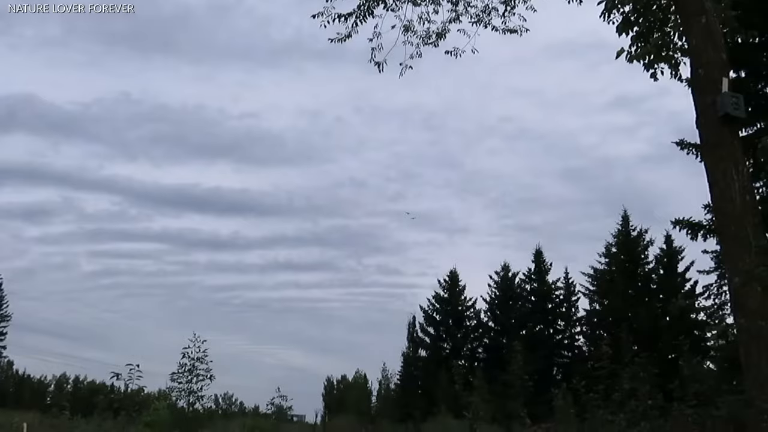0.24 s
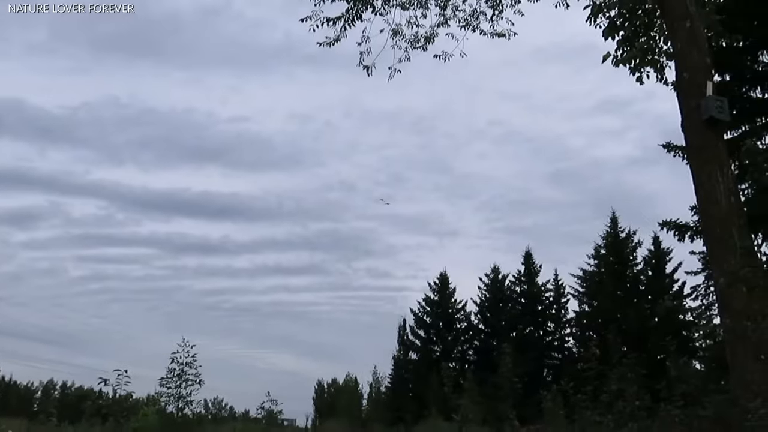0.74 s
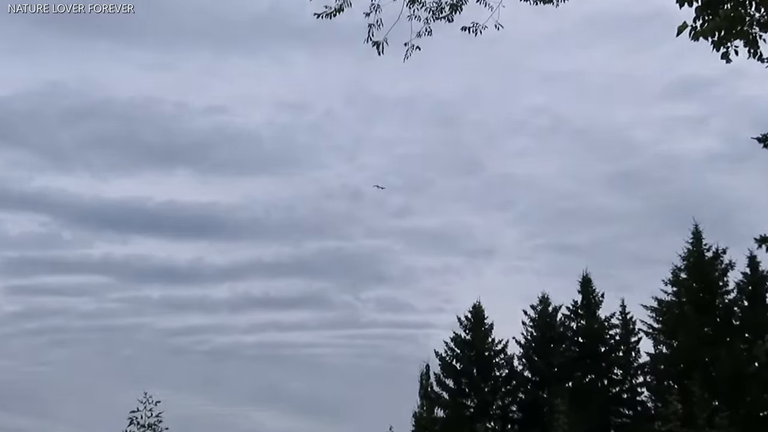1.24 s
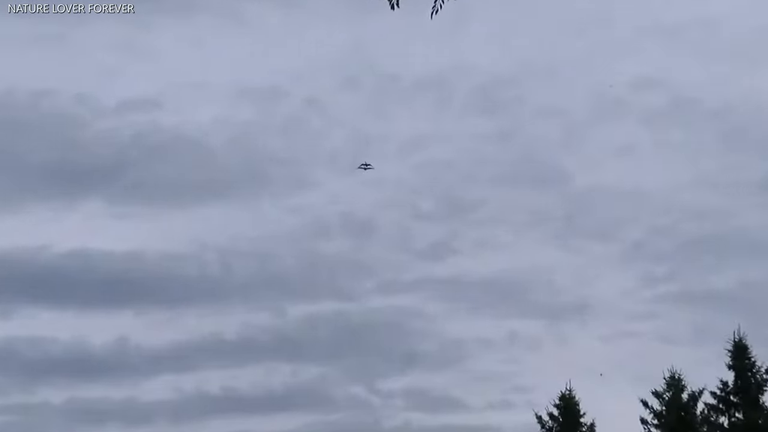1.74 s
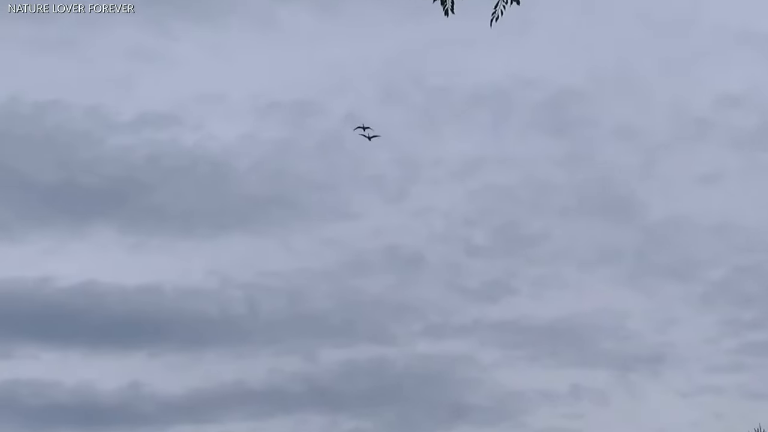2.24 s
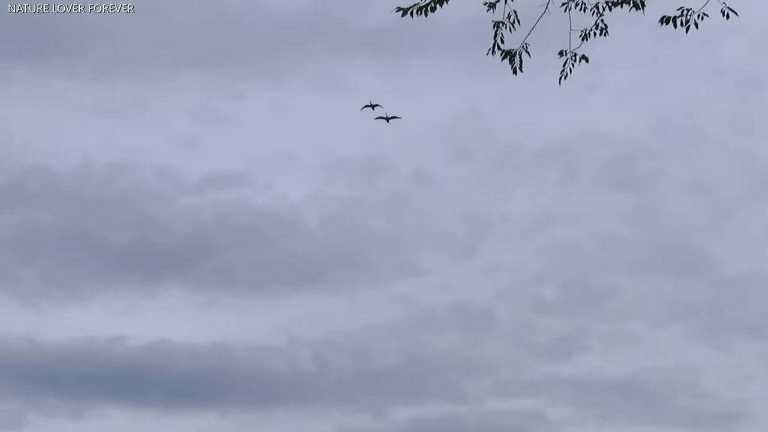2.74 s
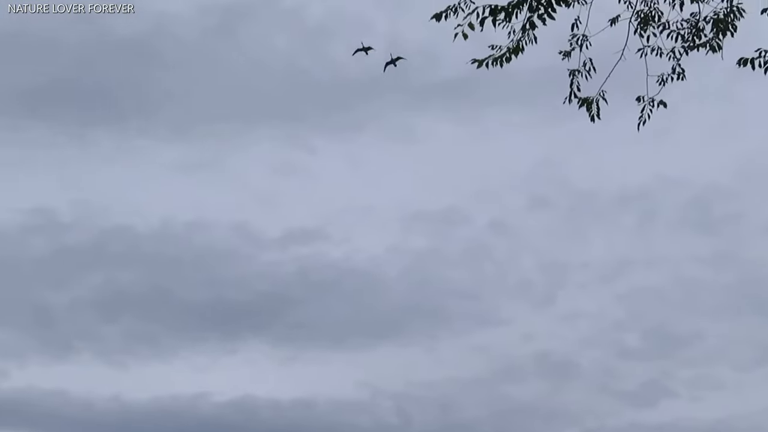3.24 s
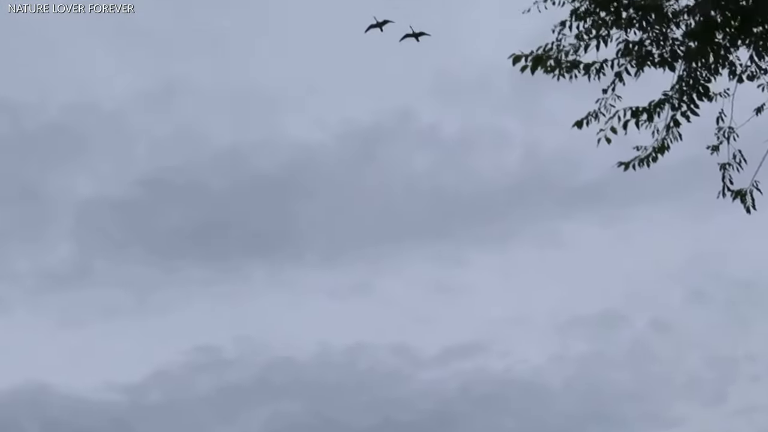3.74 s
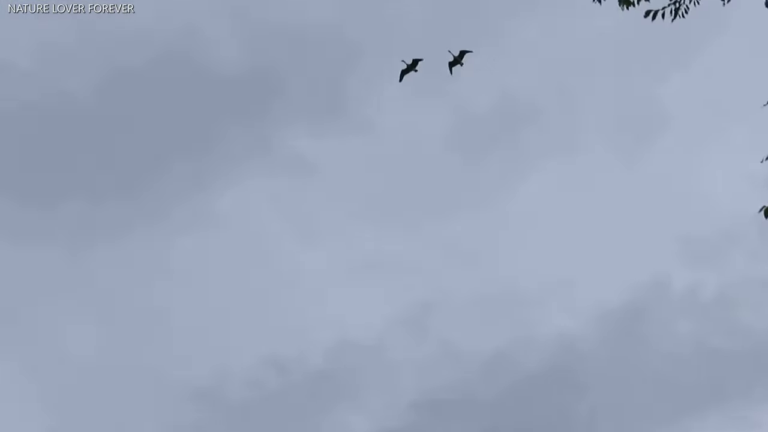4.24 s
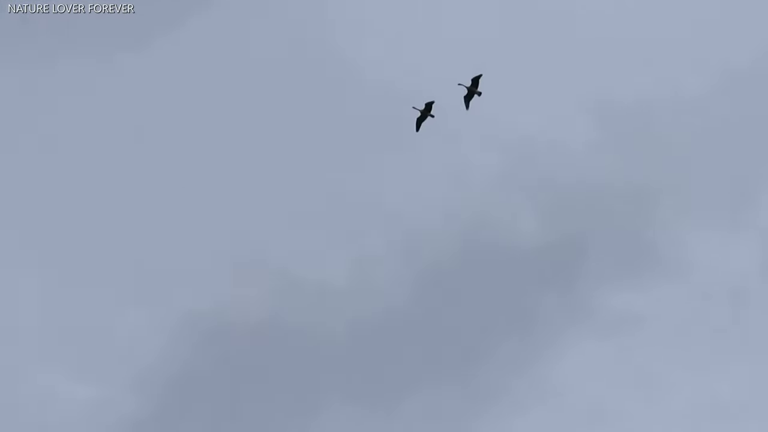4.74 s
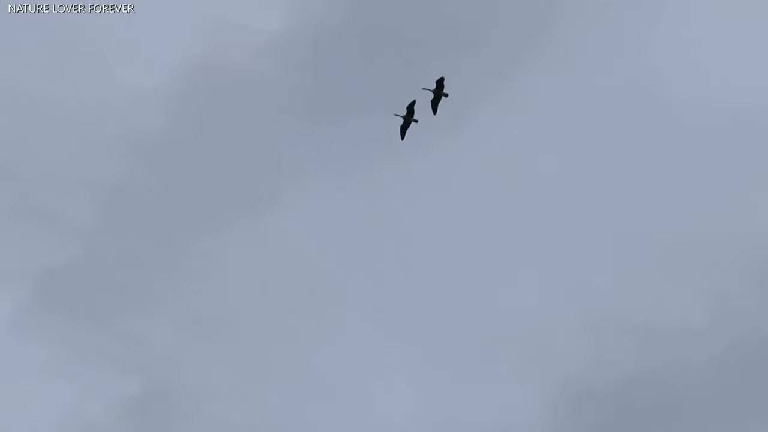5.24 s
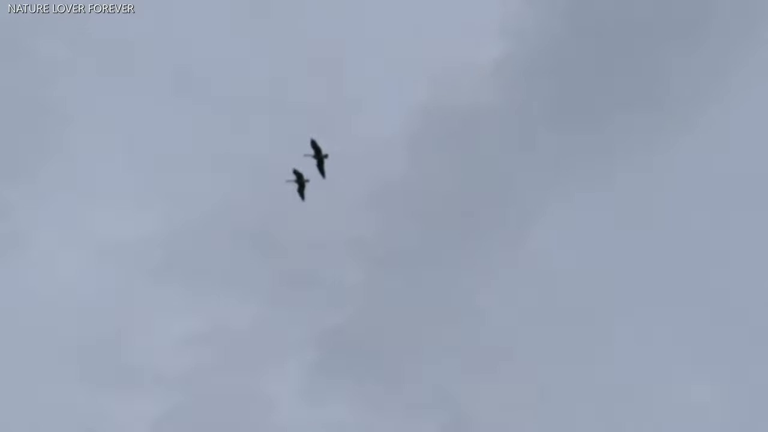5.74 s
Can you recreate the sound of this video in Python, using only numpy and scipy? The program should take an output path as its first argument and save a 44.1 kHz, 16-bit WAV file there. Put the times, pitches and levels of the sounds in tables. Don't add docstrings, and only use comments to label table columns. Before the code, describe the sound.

Outdoors by a wood edge, a pair of geese trade short, brassy, two-part honks, steadily to the end, while another goose answers weakly further off. A silent instant comes first, then low, even traffic rumble and soft air hiss, briefly wider in the treble early on. The calls are close and clear, with a dull reverberant tail from the trees, in stereo from a camera microphone, ending slightly left.

```python
import sys
import numpy as np
from scipy import signal
from scipy.fft import rfft, irfft, next_fast_len
from scipy.io import wavfile
from scipy.ndimage import uniform_filter1d, map_coordinates

SR = 44100
rng = np.random.default_rng(int(sys.argv[2]) if len(sys.argv) > 2 else 0)


def dump_mix(stems):
    frames = np.atleast_2d(stems).T
    limited = np.clip(frames, -1, 1)
    pcm = np.round(limited * 32767).astype(np.int16)
    wavfile.write(sys.argv[1], SR, pcm)


def invert_db(level):
    return 10 ** (np.asarray(level, dtype=float) / 20)


N = 263277

# [f/Hz, density/dB]
AIR_SPECTRUM = [(25, -9.5), (50, 1), (80, 0.5), (130, -4), (250, -11.5), (500, -13), (1100, -13.5),
                (1800, -29.5), (3000, -33.5), (5000, -38.5), (8000, -44), (12000, -51), (15500, -52.5)]
# [t/s, level/dB]
TRAFFIC_RUMBLE = [
    (.16, -38),
    (.4, -46),
    (2, -45),
    (4, -45),
    (5.2, -44.5),
    (5.97, -42),
]
# [f/Hz, side minus mid level/dB]
AIR_WIDTH = [(40, -29.5), (110, -27.5), (200, -14), (380, -9), (700, -22.5), (1300, -13), (2400, -1.5),
             (4400, -3.5), (8000, -9), (12000, -14.5)]
# [t/s, share 0-1]
ZOOM_SHARE = [
    (.15, 0),
    (.72, 0),
    (.84, 1),
    (1.93, 1),
    (1.97, 0),
    (5.97, 0),
]
# [t/s, left minus right level/dB]
FLIGHT_PAN = [
    (0.15, 1),
    (0.63, -1),
    (1.59, -.6),
    (3.7, -.8),
    (5.09, 3.5),
    (5.97, 3.3),
]

# [start t/s, length t/s, middle f/Hz, level/dB]
THIRD_LOW_NOTES = [(.17, 0.0364, 552.8, -40), (.322, .086, 640, -55), (.54, 0.12, 598, -40.5),
                   (.71, .095, 570, -56), (2.122, .086, 655, -43), (2.342, .096, 570, -38.5),
                   (2.475, .045, 650.3, -47.5), (2.83, 0.086, 658, -43.5), (3.652, 0.088, 532.4, -46),
                   (3.94, .08, 593, -58), (5.142, 0.11, 612, -44.5), (5.462, 0.075, 527.5, -59)]
FIRST_LOW_NOTES = [(.597, 0.066, 514.7, -34.5), (.857, 0.072, 493, -30), (1.127, 0.05, 478, -35.5),
                   (1.467, 0.088, 495.3, -27.5), (1.861, .092, 500.5, -28), (2.187, 0.095, 495.3, -27),
                   (2.487, 0.067, 478.2, -28.5), (2.824, .04, 531.4, -32.5), (3.127, 0.067, 484.7, -36),
                   (3.507, 0.1, 490.5, -25), (4.107, .076, 487, -26.5), (4.507, 0.099, 501.7, -26.5),
                   (4.917, 0.07, 487.7, -27), (5.237, 0.084, 469.3, -28), (5.607, 0.054, 460, -32.5)]
SECOND_LOW_NOTES = [(.927, 0.047, 571, -24.5), (1.267, 0.051, 581.3, -25), (1.617, 0.02, 535, -40.5),
                    (1.957, 0.033, 537.7, -29.5), (2.287, 0.038, 565, -26), (2.601, .055, 559, -24.5),
                    (2.949, 0.056, 565, -24.5), (3.287, 0.048, 563, -25), (3.597, 0.041, 560, -28),
                    (3.893, 0.059, 574, -24.5), (4.187, .051, 558.5, -30), (4.315, 0.045, 536, -37.5),
                    (4.681, 0.0508, 584, -26.5), (5.058, 0.0459, 557, -30.5), (5.403, 0.053, 539, -31),
                    (5.783, 0.072, 569.2, -23)]
# [start t/s, length t/s, middle f/Hz, level/dB, treble level/dB as the bill turns]
THIRD_HIGH_NOTES = [(.194, .096, 764.4, -44, 0.5), (.323, 0.085, 880, -40.5, 4.5),
                    (.71, .095, 780, -49, 6.5), (1.044, 0.044, 902, -52, -6), (1.85, .062, 883, -40, -4),
                    (2.122, 0.081, 879, -34, 3.5), (2.353, 0.091, 973.5, -48.5, 6),
                    (2.482, .068, 905, -33, 0), (2.82, 0.11, 872, -39.5, 6.5), (3.65, .096, 859, -37, 8),
                    (3.942, .078, 851.5, -37, 9.5), (4.192, .061, 840, -51, -8.5),
                    (5.14, 0.09, 822.4, -36.5, 7), (5.46, 0.091, 840, -37, 12)]
FIRST_HIGH_NOTES = [(.364, .049, 722, -45.5, -3), (.621, .066, 732.4, -34, -3.5),
                    (.908, .03, 706, -49, -14), (1.161, .055, 680, -32.5, -24.5),
                    (1.527, .047, 672, -42, -28), (1.929, .049, 681.3, -33, -10.5),
                    (2.26, .043, 702, -32.5, -2.5), (2.525, .066, 680.5, -32.5, -4),
                    (2.826, .067, 684, -31, 0.5), (3.169, .063, 678.4, -29, -3.5),
                    (3.588, .036, 708, -31.5, -1), (4.158, .064, 702.5, -31, -2),
                    (4.584, .047, 681.8, -33.5, 2.5), (4.967, .055, 672, -31, 1),
                    (5.305, .058, 674.4, -32, -0.5), (5.647, .064, 677, -31.5, 5.5)]
SECOND_HIGH_NOTES = [(0.955, 0.039, 751, -29, -16.5), (1.297, 0.046, 771, -30, -9),
                     (1.603, 0.096, 789.6, -27, -11.5), (1.977, 0.061, 767, -25.5, 3),
                     (2.297, 0.075, 783.4, -26.5, -2), (2.636, 0.056, 766, -25, -5),
                     (2.988, .056, 761, -25, -5.5), (3.317, 0.06, 771.2, -25, -5.5),
                     (3.617, 0.065, 790, -23.5, 0), (3.932, 0.049, 773, -24, -2),
                     (4.215, .066, 760, -35, -1), (4.347, .07, 765.7, -22.5, -0.5),
                     (4.708, 0.063, 776.4, -25, 1.4), (5.077, .074, 785, -23.5, 1),
                     (5.425, 0.077, 778, -23.5, -4), (5.838, .048, 747, -28, 0.5)]
# [start t/s, length t/s, middle f/Hz, level/dB]
STALLED_NOTES = [(.922, .031, 770.3, -34.5), (1.263, .036, 789.6, -36.5), (2.597, .032, 798, -36.5),
                 (2.954, .031, 786, -31.5), (3.285, .026, 791, -31.5), (3.895, .035, 805, -36),
                 (5.78, .05, 792.6, -33)]
# [start t/s, length t/s, middle f/Hz, level/dB]
FLOCK_CRIES = [
    (.166, 0.039, 817, -60.5),
    (.596, 0.01, 700, -55),
    (2.786, 0.037, 715, -57),
    (2.808, 0.022, 828, -54),
    (3.5, 0.027, 764.5, -54),
]
# [t/s, half length t/s, extra rasp level/dB]
SQUAWK_RASP = [
    (0.658, 0.019, 16),
    (2.398, 0.044, 10),
    (2.843, 0.02, 12),
    (4.357, 0.009, 8.5),
    (5.432, 0.027, 6.5),
    (4.705, 0.019, 5.5),
    (5.079, 0.013, 5.5),
]

# [f/Hz, level/dB]
THROAT_RESPONSE = [(150, -32.5), (450, -5.5), (800, -6.5), (1050, 1), (1600, -2), (1900, -11.5),
                   (2400, -15), (3100, -20), (3900, -15.5), (4700, -16.5), (5500, -22), (6500, -26),
                   (8000, -37), (11000, -55.5)]
# [multiple of the fundamental, level/dB]
LOW_OVERTONES = [(1, -3), (2, -1.5), (3, -15), (4, -10.5), (6, -12.5), (16, -35.5)]
HIGH_OVERTONES = [(1, 0.5), (2, 2), (3, -1.5), (4, -9), (6, -6), (13, -14)]

# (start below middle/share, end below middle/share, length for full scoop t/s, for full bend t/s
FIRST_LOW_ARC, FIRST_HIGH_ARC = (0.13, -.05, .08, .08), (-.03, .11, .05, .056)
SECOND_LOW_ARC, SECOND_HIGH_ARC = (.13, -.12, .056, .056), (.09, .14, .09, .06)
THIRD_LOW_ARC, THIRD_HIGH_ARC = (0.0082, .01, .08, .08), (-.006, .06, .08, .08)
STALL_ARC, RESTART_ARC = (0.11, -0.018, .026, -0.012), (-.035, .125, 0.0536, .055)
LOW_SWELL, HIGH_SWELL = (.8, 1.43, 0.5), (1.75, 0.68, 0.5)


def curve(rows):
    return np.interp(np.arange(N) / SR, *np.transpose(rows))


def colour(rows, hz):
    f, db = np.transpose(rows)
    return np.interp(np.log(np.maximum(hz, 1)), np.log(f), db)


def shaped(x, gain):
    size = next_fast_len(N)
    hz = np.arange(size // 2 + 1) * SR / size
    return irfft(rfft(x, size) * gain(hz), size)[..., :N]


def walk(rate):
    hold = int(SR / rate)
    steps = np.repeat(rng.standard_normal(N // hold + 1), hold)
    return 1.257 * uniform_filter1d(uniform_filter1d(steps, hold), hold)[:N]


def traffic():
    out, swell, zoom, rumble_db = 0, walk(0.21), curve(ZOOM_SHARE), curve(TRAFFIC_RUMBLE)
    for centre in 25 * 2 ** np.arange(0, 9.5, .5):
        def band(hz):
            octaves = np.clip(np.log2((hz + 1) / centre), -.5, .5)
            return invert_db(colour(AIR_SPECTRUM, hz)) * np.cos(np.pi * octaves)

        mid, side = shaped(rng.standard_normal((2, N)), band)
        treble = np.clip(np.log2(centre / 1500) / 2.5, 0, 1) * zoom
        bass_db = np.clip(np.log2(250 / centre), 0, 1) * (rumble_db - rumble_db.mean())
        mid = mid * invert_db(-3 * treble ** 4)
        side = side * invert_db(colour(AIR_WIDTH, centre) * (1 - treble) + 3.5 * treble)
        level = invert_db(bass_db + 0.46 * swell + 1.17 * walk(6.3))
        out = out + level * (mid + side * np.array([[1], [-1]]))
    return out * invert_db(-40.5) / np.sqrt(np.mean(out ** 2))


def trees(x, t60_s, delay_s, top_hz, early_db, late_db):
    t = np.arange(int(2.5 * SR)) / SR
    mid, side = rng.standard_normal((2, len(t)))
    noise = mid + 0.1 * side * np.array([[1], [-1]])
    tail = noise * invert_db(late_db - 60 * t / t60_s) * np.clip((t - delay_s) / 0.044, 0, 1)
    tail = signal.sosfilt(signal.butter(2, top_hz, fs=SR, output="sos"), tail)
    cluster = noise[:, ::-1] * invert_db(early_db - 60 * t / 0.23) * (t > .004)
    return signal.fftconvolve(x[None], tail + cluster, axes=1)[:, :N]


def place(x, pan_db):
    sides = np.array([[.5], [-.5]])
    lag = sides * (0.48 - 0.74 * pan_db)
    delayed = np.array([map_coordinates(x, [np.arange(N) - d], order=3) for d in lag])
    return delayed * invert_db(sides * pan_db)


def arcs(rows, arc):
    scoop, sag, scoop_s, sag_s = arc
    notes = []
    for t, length, hz, db, *_ in rows:
        start_hz = hz * (1 - scoop * min(length / scoop_s, 1) ** 2)
        end_hz = hz * (1 - sag * min(length / sag_s, 1) ** 2)
        notes.append((t, t + length, start_hz, hz, end_hz, db))
    return notes


def second_high():
    notes = []
    for row in SECOND_HIGH_NOTES:
        stalled = any(0 < row[0] - t < .07 for t, *_ in STALLED_NOTES)
        notes += arcs([row], RESTART_ARC if stalled else SECOND_HIGH_ARC)
    return notes + arcs(STALLED_NOTES, STALL_ARC)


def facing(rows):
    return [(t + length / 2, treble_db) for t, length, _, _, treble_db in rows]


def membrane(notes, bend, skew, round_power, waver, shimmer_db):
    hz, gain, effort = np.full(N, 600.), np.zeros(N), np.zeros(N)
    for t0, t1, start_hz, middle_hz, end_hz, db in notes:
        i = slice(int(t0 * SR), int(t1 * SR))
        u = np.linspace(0, 1, i.stop - i.start)
        w = u ** bend
        hz[i] = 2 * start_hz * (w - .5) * (w - 1) - 4 * middle_hz * w * (w - 1) + 2 * end_hz * w * (w - .5)
        lateness = skew * max((t1 - t0) / 0.069, 1) ** 0.61
        effort[i] = abs(np.sin(np.pi * u ** lateness))
        gain[i] = invert_db(db) * effort[i] ** round_power
    hz = hz * (1 + waver * walk(400))
    phase = 2 * np.pi * np.cumsum(hz) / SR
    return hz, phase, gain * invert_db(shimmer_db * walk(150)), effort


def partials(gain, tones, treble_db, size):
    out, on, flutter = np.zeros(N), gain > 0, walk(120)
    for hz, phase, db in tones(on):
        hz = hz * size
        high = np.clip(np.log2(np.maximum(hz, 1) / 1600) / 0.62, 0, 1)
        shift, turn = rng.random(2)
        own_db = 2.5 * np.roll(flutter, int(shift * N))[on]
        level_db = db + colour(THROAT_RESPONSE, hz) + high * treble_db[on] + (0.52 + 0.63 * high) * own_db
        out[on] += invert_db(level_db) * np.cos(phase + 2 * np.pi * turn)
    return np.sqrt(2) * gain * out


def goose(low, high, bill, size, first_db, cross_db, rasp_db):
    f1, p1, g1, e1 = membrane(low, *LOW_SWELL, .011, 1.5)
    f2, p2, g2, e2 = membrane(high, *HIGH_SWELL, .008, 1.4)
    both = np.sqrt(g1 * g2) * np.sqrt(e1 * e2) ** 0.65
    g1, g2 = g1 * (1 - .3 * e2), g2 * (1 - .55 * e1)
    bill_db = curve(bill)

    def low_tones(on):
        return [(k * f1[on], k * p1[on], colour(LOW_OVERTONES, k)) for k in range(1, 17)]

    def high_tones(on):
        return [(k * f2[on], k * p2[on], colour(HIGH_OVERTONES, k) + first_db * (k == 1))
                for k in range(1, 14)]

    def mixing_tones(on):
        tones = []
        for m in range(-2, 6):
            for n in range(1, 7):
                if m:
                    order = m * n * .5 + .5 if m > 0 else n - 3 * m
                    hz = abs(m * f1[on] + n * f2[on])
                    tones.append((hz, m * p1[on] + n * p2[on], cross_db - 10.5 * np.log2(order)))
        return tones

    voice = partials(g1, low_tones, bill_db - 11.7 * (1 - e1), size)
    voice += partials(g2, high_tones, bill_db - 11.7 * (1 - e2), size)
    voice += partials(both, mixing_tones, bill_db, size)
    puffs = 0.6 * both * (1 + np.cos(p2 - p1)) + 0.29 * g1 + 0.25 * g2
    breath = shaped(rng.standard_normal(N), lambda hz: invert_db(colour(THROAT_RESPONSE, hz) + rasp_db))
    t = np.arange(N) / SR
    hoarse_db = sum(db * np.exp(-((t - middle) / half) ** 2) for middle, half, db in SQUAWK_RASP)
    return voice + puffs * breath * invert_db(hoarse_db + bill_db)


def scene():
    birds = goose(arcs(THIRD_LOW_NOTES, THIRD_LOW_ARC), arcs(THIRD_HIGH_NOTES, THIRD_HIGH_ARC),
                  facing(THIRD_HIGH_NOTES), size=0.939, first_db=5.2, cross_db=5.9, rasp_db=-6.5)
    birds += goose([], arcs(FLOCK_CRIES, THIRD_LOW_ARC), [(0, 21.2), (6, 20.4)],
                   size=1.0, first_db=2.0, cross_db=0, rasp_db=-22.0)
    birds += goose(arcs(FIRST_LOW_NOTES, FIRST_LOW_ARC), arcs(FIRST_HIGH_NOTES, FIRST_HIGH_ARC),
                   facing(FIRST_HIGH_NOTES), size=0.99, first_db=4.2, cross_db=1.7, rasp_db=0.5)
    birds += goose(arcs(SECOND_LOW_NOTES, SECOND_LOW_ARC), second_high(),
                   facing(SECOND_HIGH_NOTES), size=0.982, first_db=-1.8, cross_db=-1.7, rasp_db=6.5)
    echo = trees(birds, t60_s=1.63, delay_s=0.026, top_hz=2300, early_db=-42, late_db=-52)
    return traffic() + echo + place(birds, curve(FLIGHT_PAN))


def top_cut(x):
    return signal.sosfilt(signal.butter(12, 15640, fs=SR, output="sos"), x)


def record(dry):
    start_s, rise_db_per_s = .161, 1400
    gate = np.clip(invert_db((np.arange(N) / SR - start_s) * rise_db_per_s), 0, 1)
    return top_cut(dry * gate)


dry = scene()
out = record(dry)
dump_mix(out)
```